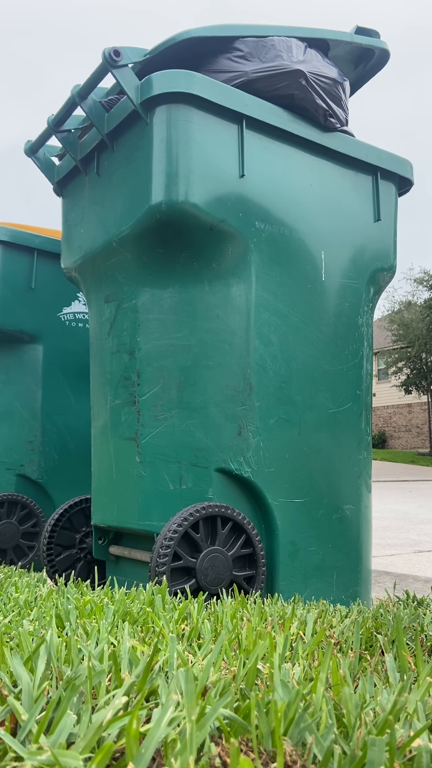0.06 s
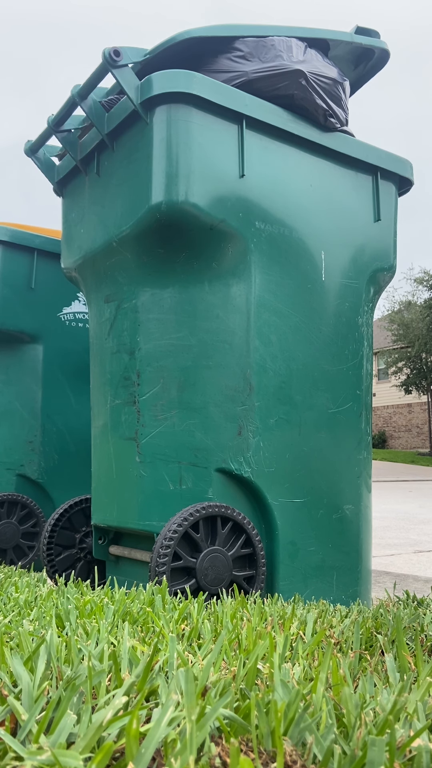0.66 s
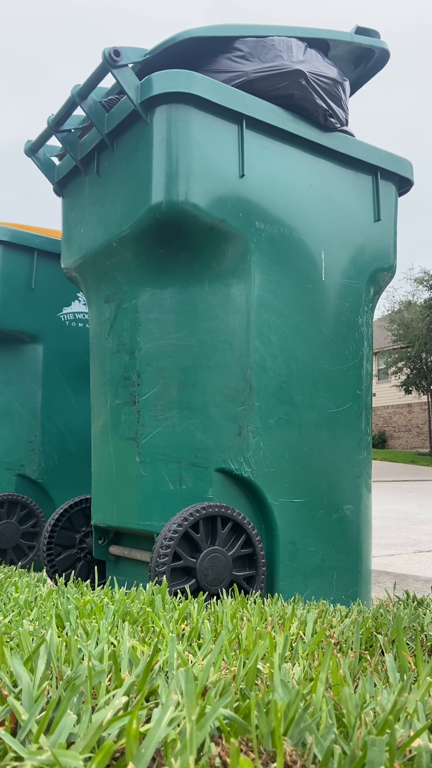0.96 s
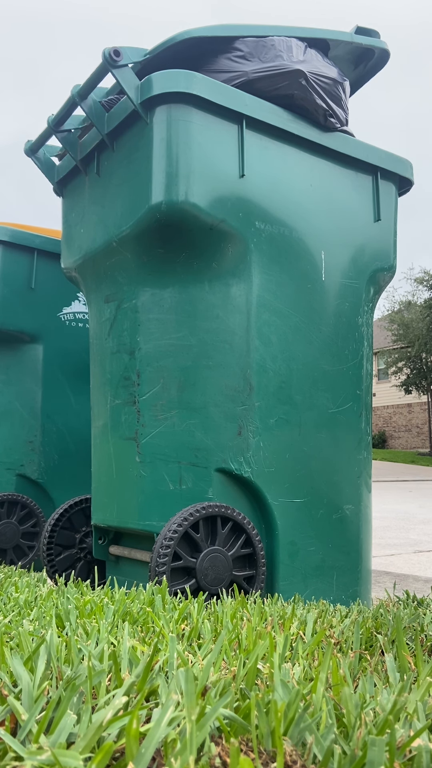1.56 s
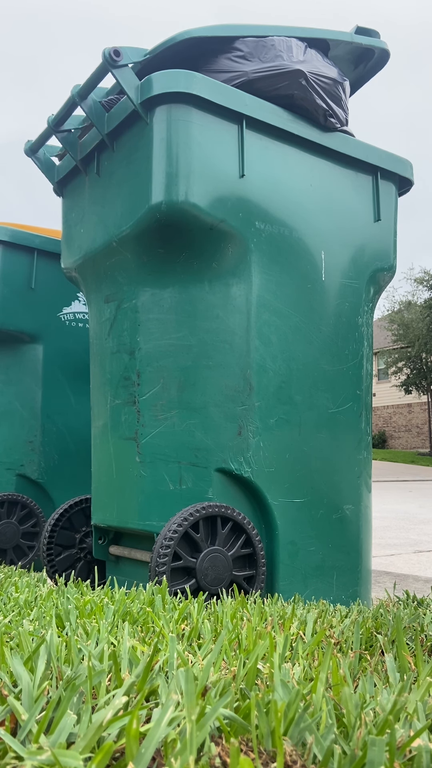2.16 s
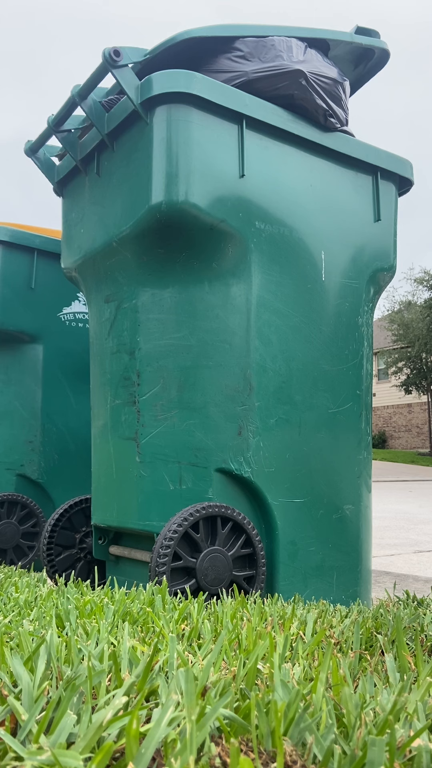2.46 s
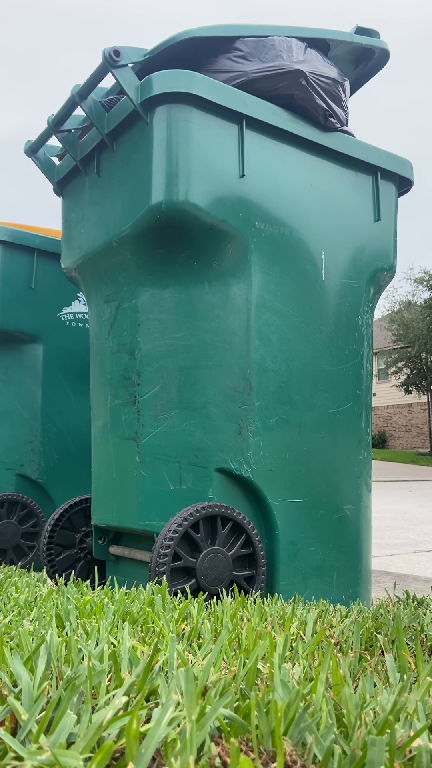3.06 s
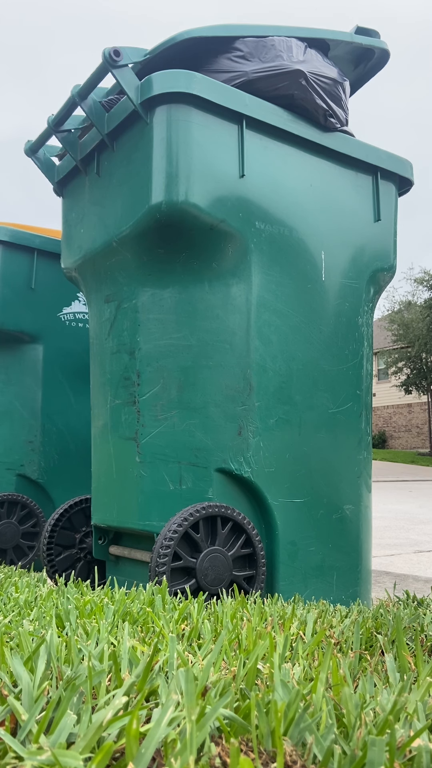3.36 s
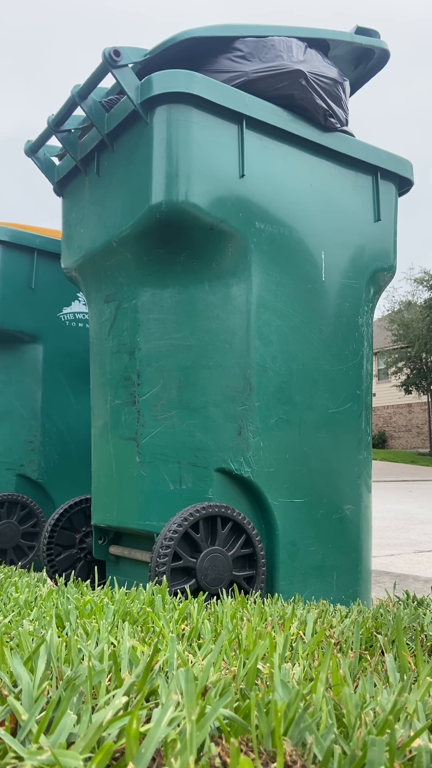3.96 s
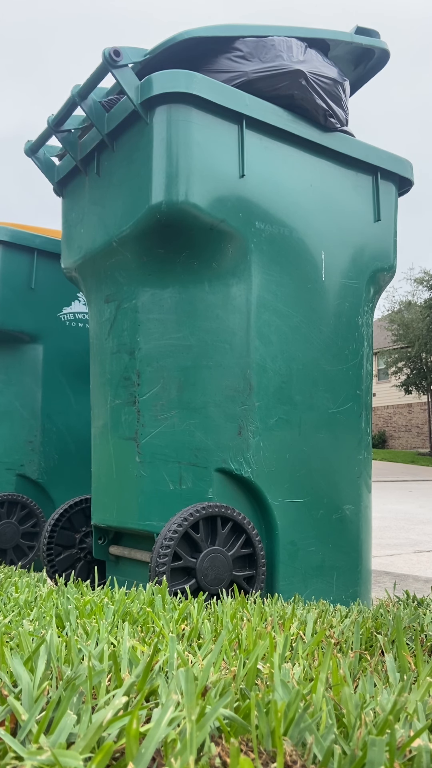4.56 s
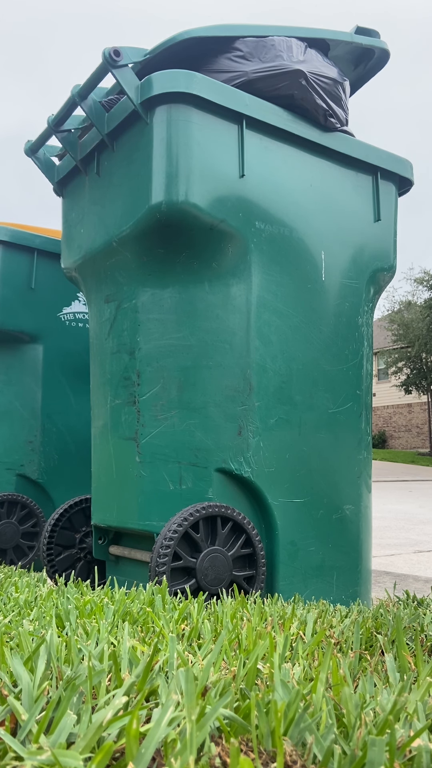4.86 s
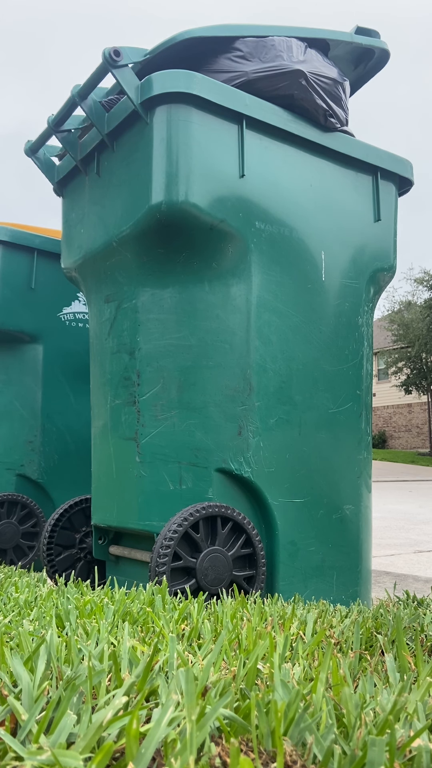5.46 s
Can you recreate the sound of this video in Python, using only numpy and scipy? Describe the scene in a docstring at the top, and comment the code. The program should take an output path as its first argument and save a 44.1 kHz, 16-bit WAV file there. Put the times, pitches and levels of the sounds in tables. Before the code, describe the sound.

On a suburban street, distant traffic rumbles under an even hiss. Brief rustles and soft low bumps sound right at the microphone while a nearby songbird whistles three rising notes, echoing off house walls. The bird goes on to seven slurred notes, with three thin high tinks among them. Past the middle, a second bird far off runs through faint, quick upward chirps.

```python
"""Distant traffic rumbles under the even hiss of a suburban street, from start to end.
Brief rustles and, later, soft low bumps of handling sound right at the microphone, while a songbird
whistles three rising notes, each a frequency-modulated tone that the house walls throw back.
It goes on to seven slurred notes, among which three thin high tinks ring, the first one doubled.
Past the middle a second bird, far off, runs through quick upward chirps."""
import sys
import numpy as np
from scipy import signal
from scipy.fft import rfft, irfft, next_fast_len
from scipy.io import wavfile
from scipy.ndimage import uniform_filter1d

SR = 44100
rng = np.random.default_rng(int(sys.argv[2]) if len(sys.argv) > 2 else 0)


def generate_wav(sig):
    """Save sig (samples, or channels by samples) to the path in sys.argv[1] as 16-bit PCM at SR."""
    pcm = np.round(np.clip(np.atleast_2d(sig).T, -1, 1) * 32767).astype(np.int16)
    wavfile.write(sys.argv[1], SR, pcm)


N = 251811
PADDED = 2 ** 18  # FFT length
TIME, FREQS = np.arange(N) / SR, np.fft.rfftfreq(PADDED, 1 / SR)
ALONG = np.linspace(0, 1, 40)  # progress through one glide
DIP_HZ = 1948  # every note of the near bird dips towards this pitch once


def amp(db):
    """The decibel scale: 20 dB is a factor of ten in amplitude."""
    return 10 ** (np.asarray(db) / 20)


def unit(x):
    """Normalisation to rms 1."""
    return x / np.sqrt(np.mean(x ** 2) + 1e-20)


def spectrum(points):
    """Interpolation of (f/Hz, value) points on a logarithmic frequency axis."""
    hz, value = np.transpose(points)
    return np.interp(np.log(FREQS + 1), np.log(hz + 1), value)


def add(mix, start, sound):
    """Superposition: a sound joins the mix at start seconds."""
    part = mix[max(round(start * SR), 0):][:len(sound)]
    part += sound[:len(part)]


def drift(size, hz):
    """Random modulation: noise of rms 1, low-passed at hz."""
    padded = 2 * next_fast_len(size // 2 + 1)
    f = np.fft.rfftfreq(padded, 1 / SR)
    return unit(irfft(rfft(rng.standard_normal(padded)) / (1 + (f / hz) ** 4))[:size])


def noise(gain):
    """Partial coherence: coloured noise, alike at both microphone ports in the bass and less so above."""
    # left-right coherence: f/Hz, coefficient
    coherence = [(100, 1), (250, 1), (500, 0.7), (1000, 0.24), (2500, 0.97), (8000, 0.49)]
    same = np.clip(spectrum(coherence), -1, 1)
    left, independent = rfft(rng.standard_normal((2, PADDED)))
    right = same * left + np.sqrt(1 - same ** 2) * independent
    return unit(irfft(gain * np.array([left, right]))[:, :N])


def ports(x, lead_ms):
    """Time and level differences: sound reaches the left microphone port lead_ms before the right."""
    # imbalance of the ports: f/Hz, left minus right level/dB
    tilt = [(60, 0.1), (130, -1), (250, -1.5), (450, -4.5), (1000, -5), (1640, -0.5), (2450, -3.5),
            (3500, -0.5), (6000, 0)]
    left = amp(spectrum(tilt) / 2) * np.exp(1j * np.pi * FREQS * lead_ms / 1000)
    return irfft(rfft(x, PADDED) * np.array([left, 1 / left]))[:, :N]


def tone(times, hz, db, waver=0.0023, flutter_db=0.77, overtone_db=-54, strain=3.1):
    """Frequency and amplitude modulation: a gliding, nearly pure tone, less steady when pushed high."""
    t = np.arange(times[0], times[-1], 1 / SR)
    pitch = uniform_filter1d(np.interp(t, times, hz), size=260)
    unrest = 1 + strain * np.clip((pitch - 2550) / 600, 0, 1)
    phase = 2 * np.pi * np.cumsum(pitch * (1 + unrest * waver * drift(len(t), 130))) / SR
    contour_db = uniform_filter1d(np.interp(t, times, db), size=180)
    level = amp(contour_db + unrest * flutter_db * drift(len(t), 120))
    fades = np.clip(np.minimum(t - t[0], t[-1] - t) / 0.0034, 0, 1)
    return np.sqrt(2) * level * fades * (np.sin(phase) + amp(overtone_db) * np.sin(2 * phase))


def traffic(rumble_db=0.25, roar_db=-0.1, lumps_db=2.0, swell_db=1.16):
    """Modulated noise and tones: a lumpy rumble, the roar of far tyres, engines sinking in pitch."""
    # slow course of the traffic: t/s, rumble level/dB, roar level/dB
    course = [(0, -43.5, -52), (0.25, -42, -51), (0.85, -47.5, -50.5), (1.3, -51.5, -54.5),
              (1.7, -50.5, -52.5), (2.1, -49, -51), (2.8, -48.0, -53.0), (3.2, -45, -53.5),
              (3.45, -38.5, -48.5), (3.8, -45.5, -50.5), (4.5, -47.0, -51.0), (5.2, -42.5, -49.5),
              (5.7, -45, -53.0)]
    # spectrum of the rumble: f/Hz, relative level/dB
    rumble_shape = [(18, -39), (30, -13.5), (52, -2), (74, 3.5), (220, -18.5), (290, -47.5), (480, -120)]
    # spectrum of the tyre roar: f/Hz, relative level/dB
    roar_shape = [(90, -14.5), (150, -3.5), (210, -6.5), (270, -4.5), (340, -9), (450, -14), (620, -17.5),
                  (820, -20.5), (1050, -29), (1400, -45), (2500, -78)]
    # engine drones: start t/s, length/s, f/Hz, sag/(Hz/s), peak t/s, peak level/dB, fade/(dB/s)
    drones = [(0, 1.3, 375.9, 120, 0.54, -53, 25.5), (1.9, 2.1, 140.7, 2, 3.3, -55, 2),
              (4.0, 1.7, 284.9, 22, 4.8, -58, 5)]
    times, low_db, high_db = np.transpose(course)
    rumble = noise(amp(spectrum(rumble_shape)))
    rumble *= amp(np.interp(TIME, times, low_db) + rumble_db + lumps_db * drift(N, 9))
    roar = noise(amp(spectrum(roar_shape)))
    roar *= amp(np.interp(TIME, times, high_db) + roar_db + swell_db * drift(N, 14))
    engines = np.zeros(N)
    for start, length, hz, sag, peak, db, fade in drones:
        t = length * ALONG
        swell = db - fade * abs(start + t - peak)
        add(engines, start, tone(t, hz - sag * t, swell, waver=.06, flutter_db=4.0, overtone_db=-22.5))
    return rumble + roar + engines


def hiss(db=-67.5):
    """Stationary noise: the even hiss of the street."""
    # spectrum of the hiss: f/Hz, relative level/dB
    air = [(400, -7), (900, 4.5), (1700, 5), (2400, 2), (3300, -12.5), (4200, -18.5), (4950, -7.5),
           (5600, -19.5), (7300, -38.5), (9000, -24.5), (12000, -27), (13500, -56)]
    return amp(db) * noise(amp(spectrum(air)))


def rustles(grain_db=1.5, top_hz=11500):
    """Friction noise: brief grainy rubs of handling right at the microphone, each in its own band."""
    # handling rubs: peak t/s, swell/s, fade/s, level/dB, centre f/Hz, width/octaves
    rubs = [(0.134, 0.006, 0.013, -34, 530, 0.64), (0.139, 0.015, 0.022, -54, 2130, 1.05),
            (0.176, 0.0054, 0.03, -36, 560, 0.52), (0.196, 0.048, 0.025, -49, 1410, 0.66),
            (0.821, 0.0093, 0.025, -77.5, 7000, 1.5), (1.223, 0.0052, 0.014, -75, 7560, 1.5),
            (1.536, 0.013, 0.049, -46, 1760, 0.65), (1.545, 0.02, 0.013, -45, 442, 0.8),
            (1.571, 0.032, 0.032, -58.5, 3680, 0.79)]
    out, grain = np.zeros((2, N)), unit(amp(grain_db * drift(N, 300)))
    for peak, swell, fade, db, hz, octaves in rubs:
        band = np.exp(-.5 * (np.log2((FREQS + 1) / hz) / octaves) ** 2)
        colour = band / (1 + (FREQS / top_hz) ** 10)
        stroke = np.exp(-np.maximum((peak - TIME) / swell, (TIME - peak) / fade))
        out += amp(db) * stroke * grain * noise(colour)
    return out


def glide(start, end, bend=1):
    """A power-law transition: early if bend is under 1, late if over."""
    return start + (end - start) * ALONG ** bend


def note(*glides, weak_hz=2315, weak_db_per_hz=0.02):
    """Phase continuity joins glides (length/s, f/Hz, level/dB); the voice weakens below weak_hz."""
    lengths, pitches, levels = zip(*glides)
    ends = np.cumsum(lengths)
    times = np.concatenate([end - length * (1 - ALONG) for end, length in zip(ends, lengths)])
    hz = np.concatenate(pitches)
    db = np.concatenate([level * np.ones_like(ALONG) for level in levels])
    return tone(times, hz, db - weak_db_per_hz * np.maximum(weak_hz - hz, 0))


def rising_notes(from_hz=2260, to_hz=2530, bend=.48):
    """Slow frequency sweeps: the near bird climbs, drops and rebounds three times, louder each time."""
    # rising notes: t/s, climb/s, relative level/dB
    rises = [(.203, .195, -63.5), (.567, 0.17, -58.5), (.938, .172, -56.5)]
    out = np.zeros(N)
    for start, climb_s, db in rises:
        climb = (climb_s, glide(from_hz, to_hz, bend), glide(db - 1, db, bend))
        drop = (0.0394, glide(to_hz, DIP_HZ), db + 2.5)
        rebound = (.052, glide(DIP_HZ, 2460), db - 0.5)
        add(out, start, note(climb, drop, rebound))
    return out


def echoes(reflections, gain_db):
    """Specular reflection: an impulse response of the direct sound and its delayed copies."""
    response = np.zeros(SR)
    response[0] = 1
    for delay, db in reflections:
        response[round(delay * SR)] += amp(db + gain_db)
    return response


def scatter(t60, onset_s=0.0047, spread=0.13):
    """Diffuse reflection: an exponential tail of energy 1, nearly the same at both ports."""
    t = np.arange(SR) / SR
    shared, left, right = rng.standard_normal((3, SR)) * amp(-60 * t / t60) * (1 - np.exp(-t / onset_s))
    tail = shared + spread * np.array([left, right])
    return tail / np.linalg.norm(tail[0])


def street(x, walls_db=0., bins_db=-6.0, leaves_db=-8.5, leaves_hz=2900, tail_db=-5.5):
    """Convolution with wall echoes, scatter from foliage and a long tail, all glancing off the bins."""
    # echoes from house walls: delay t/s, relative level/dB
    walls = [(.033, -16), (.0545, -6), (.0562, -9), (.0586, -12), (.0611, -14), (.0677, -12), (.092, -19)]
    # reflections off the bins close by: delay t/s, relative level/dB
    bins = [(.0029, -14), (.0041, -13), (.0053, -14)]
    short_waves = signal.butter(6, leaves_hz, "highpass", fs=SR, output="sos")
    leaves = signal.sosfilt(short_waves, scatter(t60=0.24))  # leaves scatter only the short waves
    response = echoes(walls, walls_db) + amp(leaves_db) * leaves + amp(tail_db) * scatter(t60=1.0)
    response = signal.fftconvolve(response, echoes(bins, bins_db)[None], axes=1)[:, :SR]
    return signal.fftconvolve(x[None], response, axes=1)[:, :N]


def bumps(ring_s=0.006):
    """Heavily damped oscillation: soft low bumps of handling that die within a few cycles."""
    # handling bumps: t/s, level/dB, f/Hz
    knocks = [(0.907, -35.5, 169), (1.072, -33.5, 128), (1.421, -38, 54.8), (2.992, -30, 62)]
    out, t = np.zeros(N), np.arange(SR // 6) / SR
    envelope = t / ring_s * np.exp(1 - t / ring_s)
    for start, db, hz in knocks:
        add(out, start, amp(db) * envelope * np.sin(2 * np.pi * hz * t))
    return out


def slurred_notes(open_s=.042, hold_s=.12, settle_s=.05, release_s=.015):
    """Fast frequency sweeps: the near bird dips, flicks up, falls, then holds a whistle that creeps up."""
    # slurs: dip t/s, top f/Hz, trough f/Hz, closing f/Hz, fall/s, sweep level/dB, whistle level/dB
    slurs = [(1.815, 3710, 2296, 2573, .066, -50.5, -50.5), (2.201, 3815, 2230, 2505, 0.059, -50.5, -53.5),
             (2.712, 3990, 2290, 2527, 0.062, -47.5, -53), (3.302, 3776, 2255, 2522, 0.076, -52, -58),
             (3.929, 3930, 2160, 2567, .076, -50.5, -52), (4.595, 3790, 2323, 2572, .078, -49.5, -50),
             (5.199, 4104, 2294, 2570, 0.073, -47.5, -50.5)]
    height = (1 + np.cos(np.pi * ALONG ** .9)) / 2
    arch_db = -7 * height ** 6 - 4 * (2 * ALONG - 1) ** 2  # the fall is loudest near its middle
    unsettled = np.exp(-hold_s * ALONG / settle_s)
    release = np.exp(-hold_s * (1 - ALONG) / release_s)
    out = np.zeros(N)
    for dip, top, trough, closing, fall_s, sweep_db, hold_db in slurs:
        opening = (open_s, glide(3587, DIP_HZ, bend=1.9), sweep_db + glide(-17.5, -1.5, bend=.5))
        flick = (.016, glide(DIP_HZ, top), sweep_db - 10)
        fall = (fall_s, trough + (top - trough) * height, sweep_db + arch_db)
        hold = (hold_s, closing + (trough - closing) * unsettled, hold_db - 2.5 * unsettled - 9.5 * release)
        add(out, dip - open_s, note(opening, flick, fall, hold))
    return out


def tinks(attack_s=0.0071, tail_db=-21, tail_t60=1.0, rasp_db=2.0):
    """Two-stage exponential decay: thin raspy ticks ring in a few high bands of noise."""
    # ticks: t/s, relative level/dB
    ticks = [(1.948, -73), (1.98, -62.5), (3.778, -64.5), (5.01, -53)]
    # ringing bands: f/Hz, width/Hz, relative level/dB, t60/s
    modes = [(6430, 820, 2.5, 0.12), (7830, 170, 4.5, 0.27), (12400, 1300, -10, 0.11),
             (15400, 870, -15.5, .1)]
    out = np.zeros(N)
    for hz, width, mode_db, t60 in modes:
        envelope = np.zeros(N)
        for peak, db in ticks:
            gap = abs(TIME - peak)
            ring = amp(-60 * gap / t60) + amp(tail_db - 60 * gap / tail_t60)
            envelope += amp(db + mode_db) * np.where(TIME < peak, np.exp(-gap / attack_s), ring)
        band = 1 / (1 + (2 * (FREQS - hz) / width) ** 4)
        out += envelope * unit(irfft(band * rfft(rng.standard_normal(PADDED)))[:N])
    return out * amp(rasp_db * drift(N, 200))


def far_bird(count=15, start_s=3.322, step_s=.0662, peak_s=3.81, peak_db=-70, fade_db_per_s=16):
    """A periodic train of upward frequency sweeps that swells and fades."""
    # one chirp, hooked at the top: t/s, f/Hz, relative level/dB
    chirp = [(-.004, 3375, -2), (.008, 3940, -3), (.017, 4840, -4.5), (.022, 5390, -3), (.027, 5550, -7.5)]
    times, hz, db = np.transpose(chirp)
    out = np.zeros(N)
    for onset in start_s + step_s * np.arange(count):
        run_db = peak_db - fade_db_per_s * abs(onset - peak_s)
        add(out, onset + times[0], tone(times, hz, db + run_db))
    return out


def scene(bird_db=-2.5, tinks_db=-2):
    """Arrival time sets direction: birds and tinks a little left; traffic and handling noise right."""
    near = street(amp(bird_db) * (rising_notes() + slurred_notes()))
    far = street(far_bird(), walls_db=-4, tail_db=-11)
    return (ports(hiss(), lead_ms=0)
            + ports(near + far, lead_ms=0.042)
            + ports(amp(tinks_db) * tinks(), lead_ms=0.058)
            + ports(traffic() + rustles() + bumps(), lead_ms=-0.21))


def record(dry, low_cut_hz=28, edge_hz=15800):
    """Band limiting: a gentle low cut and a steep treble edge."""
    low_cut = signal.butter(2, low_cut_hz, "highpass", fs=SR, output="sos")
    high_cut = signal.firwin(511, edge_hz, window=("kaiser", 9), fs=SR)
    return signal.oaconvolve(signal.sosfilt(low_cut, dry), high_cut[None], "same")


dry = scene()
out = record(dry)
generate_wav(out)
```